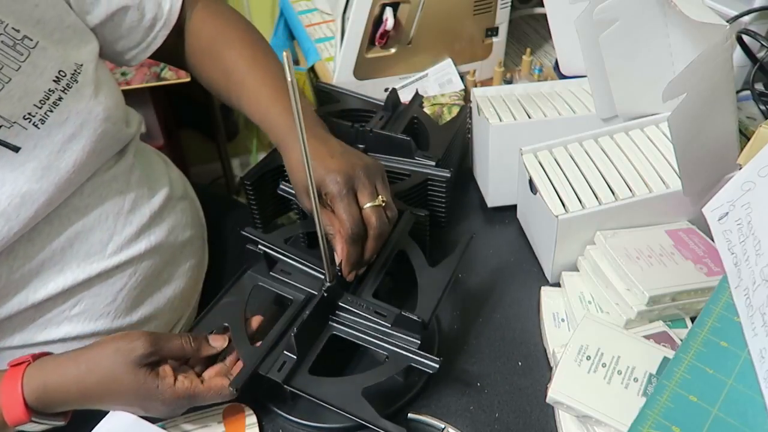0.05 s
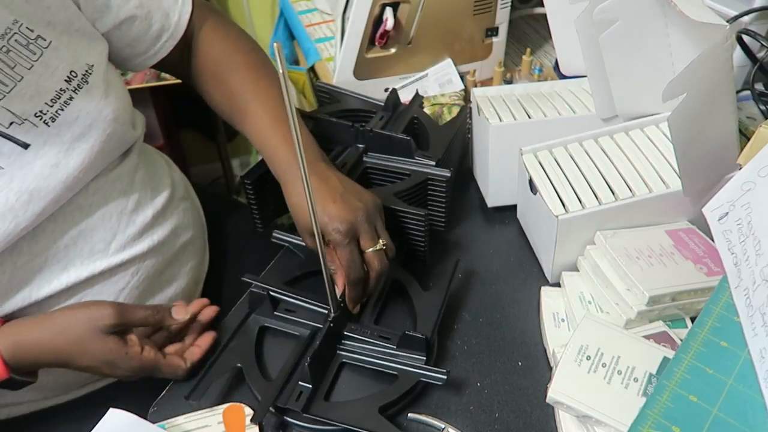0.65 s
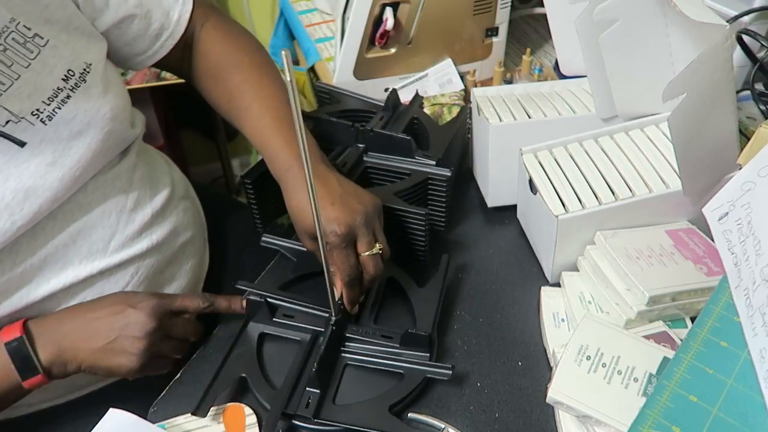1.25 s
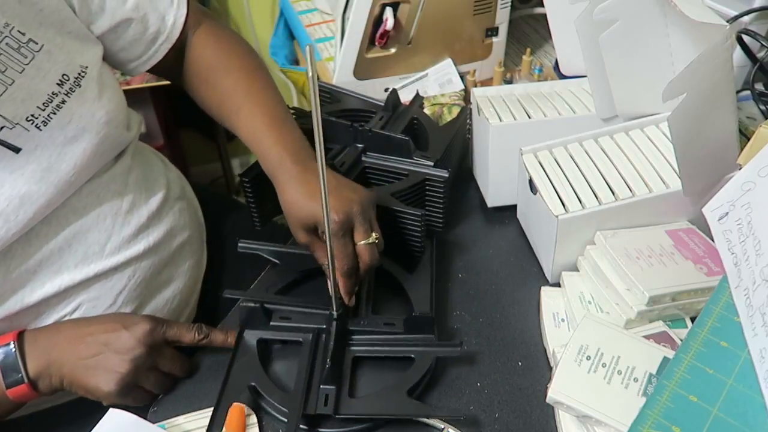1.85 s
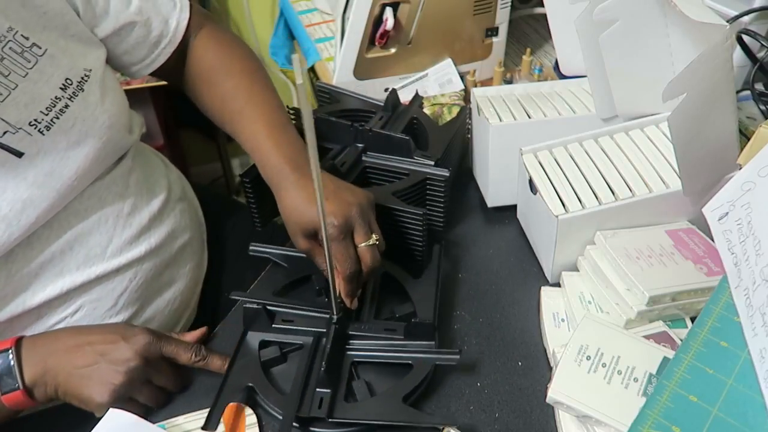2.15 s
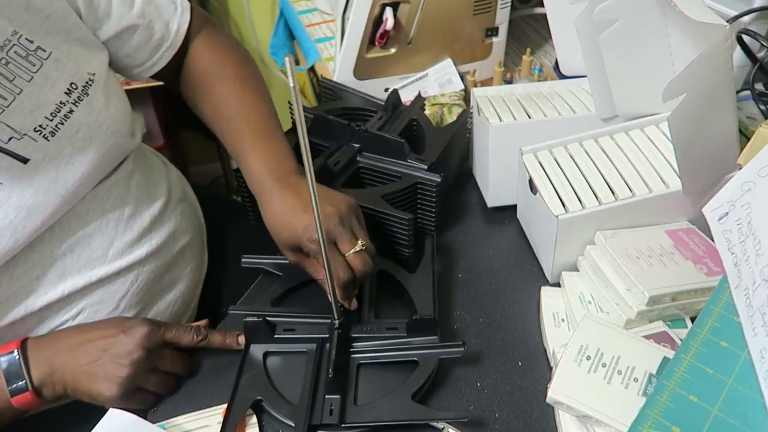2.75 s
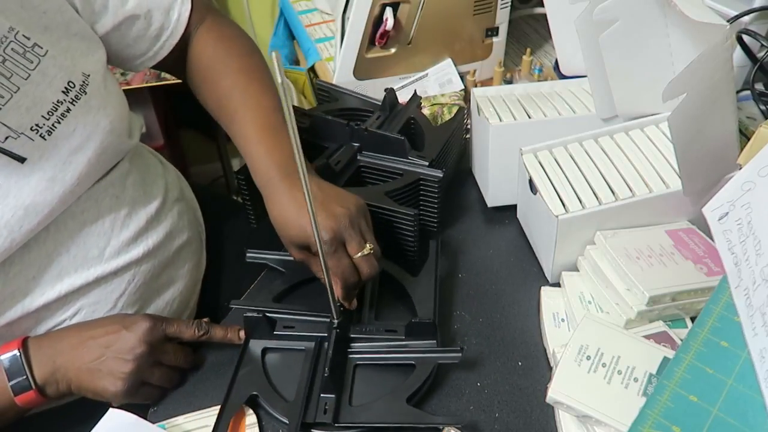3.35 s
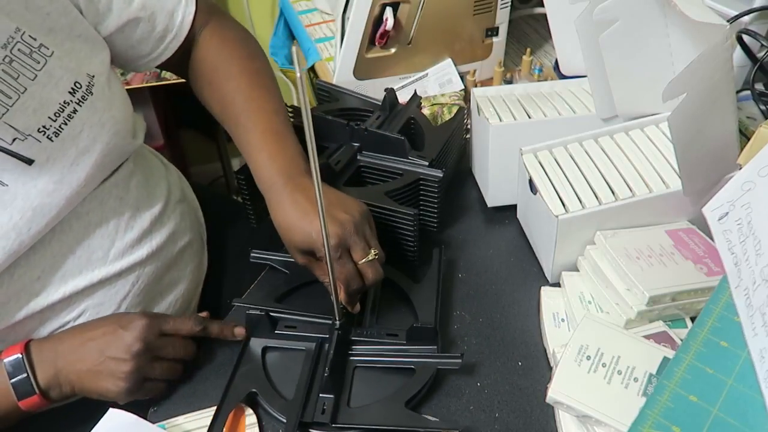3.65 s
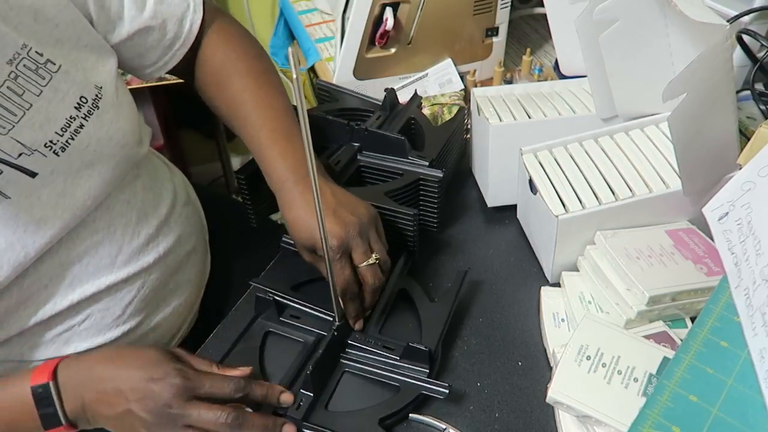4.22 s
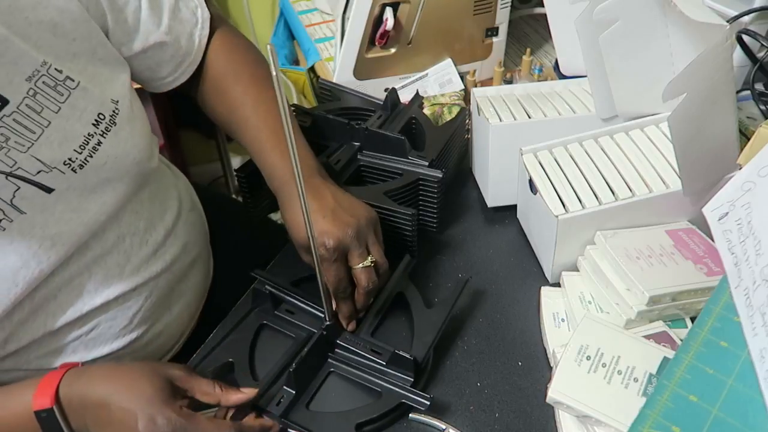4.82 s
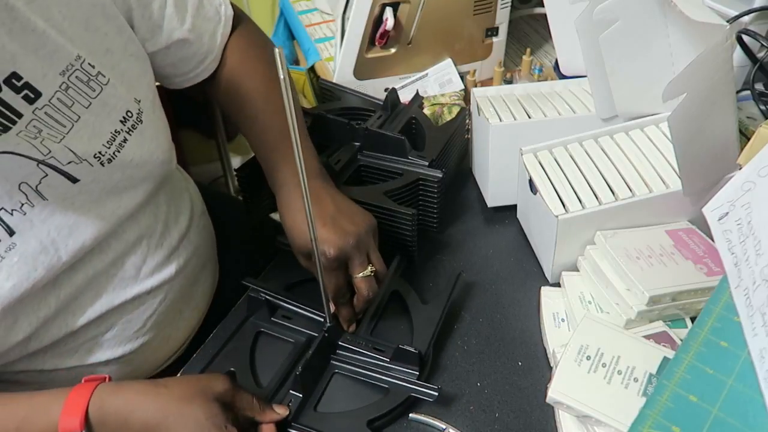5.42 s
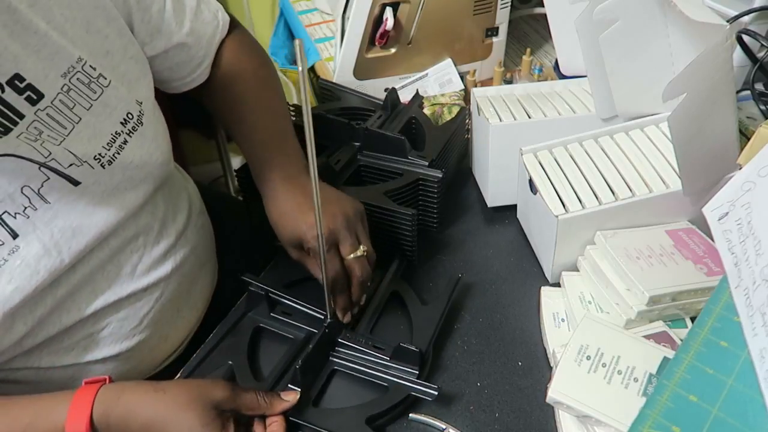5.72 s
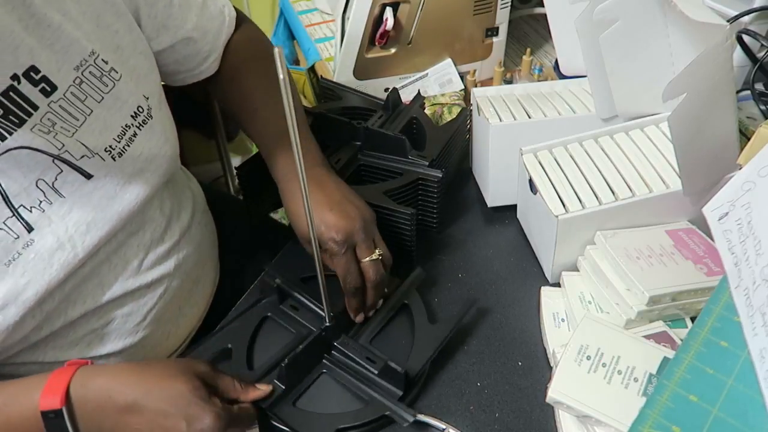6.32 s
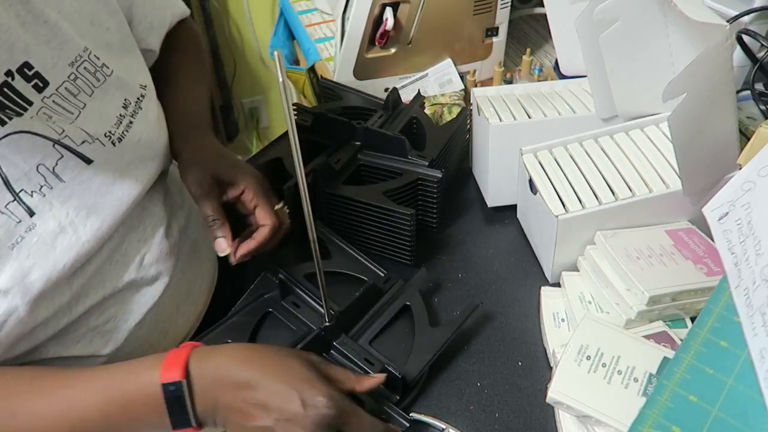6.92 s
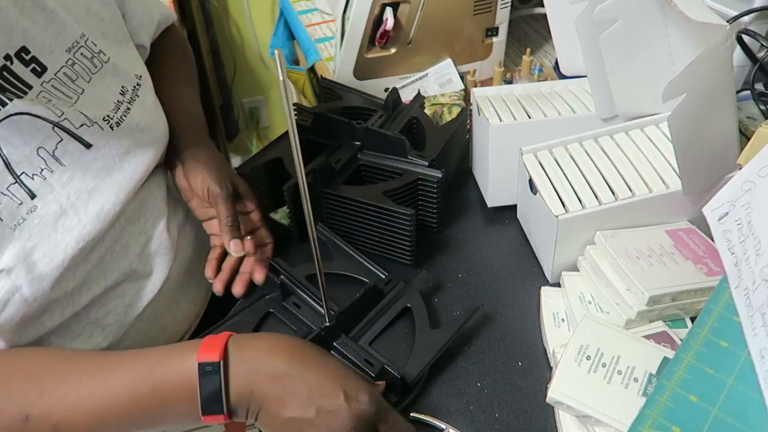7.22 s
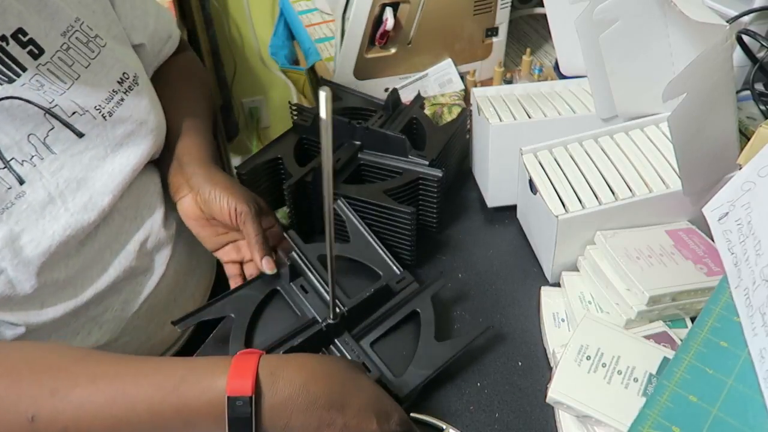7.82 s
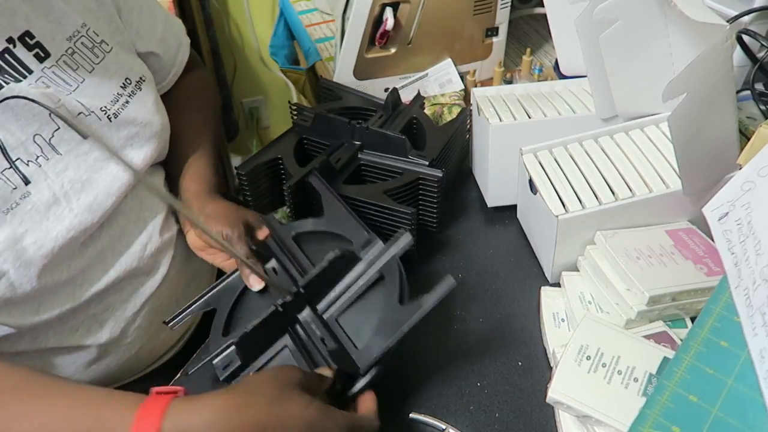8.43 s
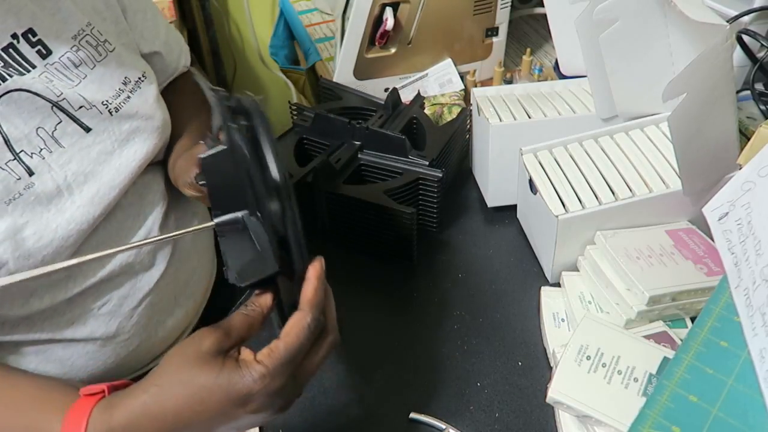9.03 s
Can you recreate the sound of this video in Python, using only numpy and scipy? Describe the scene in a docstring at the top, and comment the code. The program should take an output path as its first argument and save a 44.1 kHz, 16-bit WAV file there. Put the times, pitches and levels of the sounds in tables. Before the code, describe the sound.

Hard plastic trays click and chatter as hands turn and push them around an upright metal rod. The sounds come in uneven flurries, with short scrapes of tray over tray and dull knocks as the stack rocks on the table. Near the end, the clatter thickens and thin tabs ping briefly before it dies down. The handling sounds close, in a small room with faint air noise and hum.

```python
"""Hard plastic trays click and chatter on an upright metal rod as hands turn, push and lift the stack.
Each edge scuffs, lands and rings the tray modes; thin tabs ping. Tray scrapes over tray by stick-slip.
The stack rocks and knocks dully on its base, the table booms softly, skin rubs on plastic.
Small room with air noise and faint mains hum; stereo."""
import sys
import numpy as np
from scipy import signal
from scipy.fft import rfft, irfft, next_fast_len
from scipy.io import wavfile
from scipy.ndimage import uniform_filter1d

SR = 44100
rng = np.random.default_rng(int(sys.argv[2]) if len(sys.argv) > 2 else 0)


def materialize(psi):
    """Save the field psi as 16-bit PCM at rate SR to the path in sys.argv[1].

    A 1-D psi becomes a single channel; in a 2-D psi each row is a channel.
    """
    bounded = np.clip(np.atleast_2d(psi).T, -1, 1)
    quanta = np.round(bounded * 32767).astype(np.int16)
    wavfile.write(sys.argv[1], SR, quanta)


N = 399987
TIME_S, RING_S = np.arange(N) / SR, np.arange(8192) / SR
ATTACK_SAMPLES = int(.01 * SR)
GRIP_DETUNE = .018  # relative spread of mode frequencies

# air noise spectrum: f/Hz, gain/dB
AIR_COLOUR = [(15, -36), (25, 2), (115, 2.5), (224, -2.5), (354, -4), (709, -8.5), (903, -10), (1350, -8.5),
              (2070, -13.5), (2240, -14), (3830, -20), (11800, -46), (15000, -62.5)]
# mains partials: f/Hz, level/dB re air
HUM_PARTIALS = [(59.2, -12.5), (118.4, -9)]
# background envelope: t/s, level/dB
BACKGROUND_ENVELOPE = [(0, -49.5), (.55, -67), (.9, -59.5), (1.5, -54), (3, -57), (3.7, -60), (4.2, -58.5),
                       (5, -48.5), (6.8, -55.5), (9.07, -56)]

# table top modes: f/Hz, level/dB, t60/s
TABLE_MODES = [(77.6, -7.5, 0.2), (112, 6.5, 0.12), (146.7, -1.5, 0.24), (205, 0, 0.16)]
# modes of the stack on its base: f/Hz, level/dB, t60/s
BASE_MODES = [(109, -19, 0.4), (148, -23, 0.06), (240, -9, 0.033), (269, -14, 0.52), (351, -9, 0.24),
              (398.2, 1.5, 0.13), (455.3, -3.5, 0.059), (556.8, -9.5, 0.26), (665, 2.5, 0.2),
              (726.6, -7, 0.24), (836, -7, 0.068), (974, -7, 0.23)]
# tray modes: f/Hz, level/dB, t60/s
TRAY_MODES = [(1333, -1.5, 0.28), (1452, 4, 0.041), (1470, 2.5, 0.049), (1660, -1.5, 0.14), (1649, 0, 0.11),
              (1972, 3, 0.064), (2055, 4.5, 0.085), (2140, 0, 0.28), (2305, 1.5, 0.03), (2218, 4.5, 0.21),
              (2479, 2, 0.11), (2703, -1.5, 0.21), (2930, -4.5, 0.11), (3093, -5, 0.062),
              (3160, -14.5, 0.042), (3740, -9.5, 0.46), (4210, -4.5, 0.044), (5050, -14.5, .15),
              (5410, -22.5, 0.079), (6810, -15, 0.059), (7630, -24, .12), (7800, -34.5, 0.075),
              (11340, -21, 0.13)]
# tab modes: f/note, level/dB, t60/s
TAB_MODES = [(1, -7, 0.053), (1.05, -10.5, .035), (1.65, -15.5, .035)]
# dense weak tray modes: f/Hz, gain/dB
TRAY_WASH = [(550, -39.5), (850, -12.5), (1050, -6), (1400, 4.5), (2200, -4), (3000, -3.5), (4000, -12),
             (5000, -20.5), (8000, -29.5), (10000, -38), (15000, -42)]
# dense weak base modes: f/Hz, gain/dB
BASE_WASH = [(35, -32), (70, -18), (110, -10.5), (190, -7.5), (300, -3), (400, -1), (720, 3), (850, -8.5),
             (1100, -0.5), (1800, -51)]
# rocking base spectrum: f/Hz, gain/dB
ROCK_SPECTRUM = [(25, -7), (70, -3), (120, 8), (190, -4), (300, 2), (400, 5), (520, 0.5), (600, -4),
                 (680, 10), (820, -6), (1100, -17.5), (1800, -42.5)]
# skin friction spectrum: f/Hz, gain/dB
SKIN_SPECTRUM = [(2500, -19.5), (4500, 4.5), (6000, 5.5), (8000, 0), (10000, -3.5), (12500, -2.5),
                 (15000, -30.5)]

# hand pushes reaching the table: t/s, level/dB
TABLE_THUMPS = [(0.246, -34.5), (2.041, -46), (3.347, -35), (3.382, -39), (3.491, -43), (4.573, -47),
                (5.419, -43), (6.124, -38.5), (6.165, -38), (6.327, -39), (7.108, -39), (7.758, -42),
                (7.812, -38.5), (8.222, -36)]
# skin friction envelope: t/s, level/dB
SKIN_ENVELOPE = [(0, -67), (.35, -55.5), (.56, -86), (1.85, -86), (2.02, -61.5), (2.4, -70), (2.8, -82.5),
                 (3.4, -69), (3.7, -90), (4.22, -77.5), (4.3, -71.5), (6.55, -64.5), (6.94, -72.5),
                 (6.98, -50), (7.12, -53.5), (7.2, -68.5), (8.26, -65), (8.5, -73.5), (9.07, -74.5)]
# turns of the stack: peak t/s, build/s, release/s, scrape/dB before trim, rock/dB
STACK_TURNS = [(0.0, .05, 0.086, -28.5, -37), (0.3, .12, 0.093, -22.5, -32), (0.5, .08, .04, -34.5, -51),
               (0.752, .15, 0.21, -49, -60.5), (0.959, 0.21, 0.16, -44, -50.5), (1.4, 0.82, .5, -53, -55),
               (1.879, .15, .15, -47, -48.5), (2.002, 0.091, 0.13, -27, -34.5),
               (2.141, 0.024, 0.29, -27.5, -36), (2.36, 0.16, 0.36, -31, -37),
               (2.56, 0.27, .22, -32, -38.5), (2.7, 0.18, 0.044, -24, -34),
               (3.39, 0.18, 0.051, -30.5, -36.5), (3.98, 0.13, 0.093, -35, -44.5),
               (4.35, 0.058, 1, -44.5, -53.5), (4.67, 0.13, 0.15, -37.5, -45.5),
               (5.02, 0.19, 0.6, -39.5, -48.5), (5.55, 0.58, 0.28, -43.5, -54), (5.8, 0.26, 0.61, -40, -45),
               (6.29, 0.12, 0.22, -39.5, -38.5), (6.61, 0.19, 0.036, -33.5, -49.5),
               (7.15, 0.17, 0.099, -27, -42.5), (7.5, 0.34, 0.92, -40, -44), (7.8, 0.29, 0.33, -27, -40.5),
               (8.17, .13, 0.34, -36.5, -55)]
# edge sliding on its neighbour: start/s, end/s, level/dB, centre f/Hz
EDGE_SLIDES = [(0.092, 0.16, -37, 2440), (0.208, 0.243, -29.5, 2340), (0.345, 0.398, -30, 2300),
               (1.949, 2.016, -38, 1700), (1.986, 2.069, -32.5, 2120), (2.375, 2.544, -41, 1820),
               (3.798, 3.942, -40.5, 2780), (4.249, 4.347, -46.5, 2300), (4.714, 4.776, -41.5, 3020),
               (5.706, 5.905, -45, 1970), (6.054, 6.12, -32.5, 2110), (6.105, 6.147, -36.5, 2060),
               (6.218, 6.331, -31.5, 1950), (6.609, 6.657, -33.5, 1900), (7.744, 7.8, -28, 2400),
               (7.836, 7.903, -26.5, 2120)]
# tab flicks: t/s, level/dB, note f/Hz
TAB_PINGS = [(2.885, -50, 2155), (2.917, -44.5, 1462), (3.098, -43.5, 2370), (3.31, -33, 1430),
             (4.378, -43, 1490), (4.391, -39.5, 1670), (4.422, -46, 1630), (7.834, -36, 3340),
             (7.935, -32, 2380), (7.997, -30, 2170), (8.045, -30, 2264), (8.077, -18.5, 2210),
             (8.14, -30.5, 2185), (8.306, -39, 2300)]
# stack dropping on the table: t/s, level/dB before trim, centre f/Hz
STACK_KNOCKS = [(0.0894, -25, 433), (0.1866, -27, 520), (0.25, -13, 437), (0.491, -29.5, 473),
                (0.7672, -40.5, 573), (1.172, -31.5, 434), (1.3606, -26.5, 534), (2.0495, -23, 460),
                (2.204, -16, 654), (2.4973, -23.5, 690), (2.6298, -19, 406), (3.142, -25, 390),
                (3.3863, -16.5, 517), (3.4968, -14, 560), (3.5822, -28.5, 580), (4.7032, -28.5, 550),
                (5.0452, -29.5, 570), (6.03, -34.5, 490), (6.1237, -36, 460), (6.159, -32, 398),
                (7.1101, -11, 477), (7.2839, -24, 496), (7.3716, -27, 520), (7.511, -36, 404),
                (7.6281, -29, 570), (8.2273, -14, 855)]
# edge landings: t/s, ring level/dB, centre f/Hz, body/dB, snap/dB (both re ring, before trim),
# nominal damping t60/s
EDGE_CLICKS = [(0.079, -23.5, 2120, -12, -24.0, 0.12), (0.266, -20.5, 2640.0, -20, -10.5, 0.073),
               (0.277, -14.5, 2520, -15, -21, 0.065), (0.377, -3.5, 2100, -16.5, -15.5, 0.029),
               (0.401, -21.5, 1860, -32, -43, 0.21), (0.441, -19, 2310.0, -13.5, -22, 0.058),
               (0.612, -48.5, 2050.0, -8.5, -37, 0.09), (0.928, -19.0, 2075, -9, -18, 0.078),
               (0.957, -28, 1740.0, -15.5, -25, 0.14), (1.003, -33.5, 1930, -7.5, -26, 0.12),
               (1.138, -44.0, 1810.0, -7, -22.0, 0.33), (1.212, -40.0, 1600.0, -7.5, -45, 0.055),
               (1.24, -37.0, 1720, -5.5, -30, 0.11), (1.3137, -37.5, 1710, -7, -44.0, 0.083),
               (1.3765, -30.5, 1760, -10, -25.0, 0.052), (1.4134, -40.0, 1950.0, -19, -30.0, 0.034),
               (1.4643, -45, 2260, -19, -26, 0.048), (1.533, -33.0, 2020, -7.5, -33.0, 0.068),
               (1.56, -41, 1890, -0.5, -28, 0.4), (1.657, -29, 2270, -19, -22.5, 0.079),
               (1.672, -29, 1830, -5.5, -39, 0.13), (1.893, -43, 2030, -14, -36, 0.063),
               (1.934, -32.5, 1510, -7, -41, 0.2), (2.0062, -24, 2210.0, -8, -15.5, 0.21),
               (2.045, -16.5, 1910, -9.5, -22.5, 0.12), (2.1425, -14, 1820, -13.5, -18.5, 0.05),
               (2.1598, -24.5, 1920.0, -11, -21, 0.14), (2.1918, -25.0, 2190.0, -6, -15.5, 0.13),
               (2.202, -19.5, 2010, -6.5, -35, 0.093), (2.289, -31.5, 2290.0, -5, -21, 0.043),
               (2.3468, -21, 1970.0, -6, -24.5, 0.054), (2.381, -17.0, 1970, -6.0, -20.5, 0.073),
               (2.4453, -26.5, 1630.0, -1.5, -48, 0.088), (2.4714, -23.5, 1840, -6.5, -54, 0.13),
               (2.4945, -24, 1900, -12, -48, 0.18), (2.5943, -28.5, 2580, -11.0, -16.5, 0.049),
               (2.6742, -10, 2110, -12, -22, 0.033), (3.041, -42.5, 1910, -0.5, -43.5, 0.13),
               (3.0978, -39.0, 2190.0, -1.0, -32, 0.095), (3.15, -31.5, 2060.0, -9, -34, 0.082),
               (3.3357, -29.5, 2010.0, -12, -19.5, 0.073), (3.3788, -17.5, 2090, -10.5, -25.5, 0.055),
               (3.4307, -14.5, 2180, -11.5, -31, 0.042), (3.4692, -16, 2080, -11, -15.5, 0.094),
               (3.4799, -15.5, 2240, -2.5, -18, 0.091), (3.4948, -13.5, 2200, -6.0, -14, 0.052),
               (3.5106, -13.5, 2330, -17, -22, 0.047), (3.5432, -30, 2520.0, -10, -29, 0.097),
               (3.963, -15.5, 2220, -12.5, -22.0, 0.072), (3.9857, -15.5, 2220, -20.0, -34.0, 0.035),
               (4.0488, -41, 1610.0, -18, -34.0, 0.08), (4.1093, -47, 1830.0, -1.0, -19.5, 0.16),
               (4.4488, -25.5, 2700, -12.5, -29.0, 0.032), (4.569, -22.5, 2100, -12.5, -18.5, 0.045),
               (4.58, -25.5, 1780, -7, -25, 0.055), (4.6709, -35.5, 1970.0, -5, -23, 0.06),
               (4.8035, -32.0, 2230, -4.0, -30.0, 0.07), (4.8833, -28, 2120, -7.5, -44, 0.1),
               (4.9468, -39, 1950.0, -10, -32, 0.2), (5.0221, -26.5, 2380.0, -6, -49, 0.12),
               (5.1078, -19.5, 2730.0, -11, -37, 0.059), (5.1458, -18, 2060.0, -18, -29.5, 0.078),
               (5.3302, -40.0, 1670, -1.5, -21, 0.027), (5.4201, -27.5, 2320.0, -10, -17.5, 0.069),
               (5.549, -47, 2190, 0, -11, 0.021), (5.7734, -44.5, 2210.0, 5.5, -7.5, 0.21),
               (5.8596, -28.5, 1910, -6.5, -26, 0.062), (5.9282, -31, 1720.0, -12, -46.0, 0.07),
               (5.9665, -14.0, 2470, -16.5, -33, 0.021), (6.1595, -38.5, 2010, -7, -23, 0.04),
               (6.324, -11.5, 2380, -9.5, -23.5, 0.052), (6.41, -28.5, 2170, -7, -26.0, 0.18),
               (6.508, -29, 1770, -11.5, -21.5, 0.014), (6.9679, -29, 1670, -8.5, -16.5, 0.06),
               (7.0316, -35, 2330, -22, -23, 0.078), (7.1006, -30.5, 1680, -9, -13, 0.12),
               (7.1166, -18, 1560, -8.5, -35, 0.043), (7.1456, -19, 2130, -27, -21.0, 0.084),
               (7.155, -14.5, 2060, -10, -18.5, 0.022), (7.1842, -26, 1930, -17, -35, 0.044),
               (7.259, -38, 1950, 1, -23, 0.089), (7.2788, -26.5, 1880, -9, -20, 0.035),
               (7.364, -34, 1840, -25.0, -44.0, 0.055), (7.4554, -35.5, 1550, -5, -33, 0.039),
               (7.6643, -32, 1730.0, -3.5, -20, 0.04), (7.7365, -16, 2390.0, -14.5, -23.0, 0.12),
               (7.7757, -15.5, 2370, -19, -21.5, 0.061), (7.834, -20, 2460.0, -19, -28, 0.11),
               (7.866, -19, 1960, -13.5, -27.0, 0.065), (7.897, -9, 1950, -19, -19, 0.044),
               (8.0437, -33.5, 2250.0, -19.0, -11.0, 0.051), (8.0793, -33.0, 2420.0, -16, -11, 0.08),
               (8.168, -34.5, 1990.0, -2, -37, 0.13), (8.195, -25, 2200, -18, -19, 0.06),
               (8.2024, -19.5, 2340.0, -19, -20, 0.072), (8.2143, -20.5, 1990, -19, -24, 0.095),
               (8.2384, -14.5, 2230, -20, -15.5, 0.035), (8.499, -35.5, 1890.0, -21, -21.5, 0.05),
               (8.7256, -44.5, 2110.0, -18, -20, 0.085)]


def undb(db):
    return 10 ** (np.asarray(db) / 20)


def unit(x, count=None):
    """Scale to rms 1 over the first count samples."""
    return x / np.sqrt(np.mean(x[..., :count] ** 2) + 1e-18)


def spectrum(points, size):
    """Interpolate (f/Hz, value) points onto FFT bins."""
    hz, value = np.transpose(points)
    return np.interp(np.log1p(np.fft.rfftfreq(size, 1 / SR)), np.log1p(hz), value)


def colour(x, points):
    """Minimum-phase filter from (f/Hz, gain/dB) points."""
    size = next_fast_len(len(x), True)
    cepstrum = irfft(np.log(undb(spectrum(points, size))), size)
    cepstrum[1:size // 2] *= 2
    cepstrum[size // 2 + 1:] = 0
    return irfft(rfft(x, size) * np.exp(rfft(cepstrum)), size)[:len(x)]


def cut(x, hz, kind):
    return signal.sosfilt(signal.butter(4, hz, kind, fs=SR, output="sos"), x)


def fade(t60_s):
    return np.exp(-np.log(1000) * RING_S / t60_s)


def rise(tau_s):
    return 1 - np.exp(-RING_S / tau_s)


def add(track, t_s, sound):
    start = max(int(t_s * SR), 0)
    track[start:start + len(sound)] += sound[:max(N - start, 0)]


def walk(rate_hz):
    """Smooth random drift, spread near 1."""
    hold = int(SR / rate_hz)
    steps = np.repeat(rng.standard_normal(N // hold + 1), hold)
    return 1.3 * uniform_filter1d(steps, hold)[:N]


def ringing(modes):
    """One decaying sine per mode, in rows."""
    return np.array([undb(db) * np.sin(2 * np.pi * hz * RING_S) * fade(t60_s) for hz, db, t60_s in modes])


def gripped(modes):
    """Grip shifts each mode slightly."""
    return [(hz * (1 + GRIP_DETUNE * rng.standard_normal()), db, t60_s) for hz, db, t60_s in modes]


def strike(rings, wash_colour, wash_db, wash_t60_s, scatter_db):
    """One blow: the contact point reweights the modes, over a wash of weaker ones."""
    weights = rng.choice([-1, 1], len(rings)) * undb(scatter_db * rng.standard_normal(len(rings)))
    wash = colour(rng.standard_normal(len(RING_S)) * fade(wash_t60_s), wash_colour)
    return unit(weights @ rings, ATTACK_SAMPLES) + undb(wash_db) * unit(wash, ATTACK_SAMPLES)


def favour(x, hz, skirt_db):
    """Contact hardness favours the octave around hz."""
    return unit(colour(x, [(hz / 2, skirt_db), (hz, 0), (hz * 2, skirt_db)]), ATTACK_SAMPLES)


def slips(rate_hz, spread_db):
    """Stick-slip: random tiny jerks, a few much larger."""
    size = undb(spread_db * np.minimum(rng.exponential(size=N), 4))
    return (rng.random(N) < rate_hz / SR) * size * rng.standard_normal(N)


def room_tone():
    """Air noise and mains hum, swelling and sinking together."""
    air = unit(colour(rng.standard_normal(N), AIR_COLOUR))
    hum = sum(undb(db + 1.3 * walk(5.6)) * np.sin(2 * np.pi * hz * TIME_S) for hz, db in HUM_PARTIALS)
    return (air + hum) * undb(np.interp(TIME_S, *np.transpose(BACKGROUND_ENVELOPE)))


def small_room(x, wet_db, t60_s, treble_t60_s):
    """Direct sound plus wall reflections building over 8 ms."""
    noise = rng.standard_normal(len(RING_S))
    tail = cut(noise, 5500, "low") * fade(t60_s) + cut(noise, 5000, "high") * fade(treble_t60_s)
    tail *= np.clip(RING_S / 0.008, 0, 1) ** 2
    return x + undb(wet_db) * signal.fftconvolve(x, tail / np.linalg.norm(tail))[:N]


def stereo_ports(x, side_db):
    """Two microphone ports: nearby surfaces shift their phase; the right gets more of the low modes."""
    echoes = rng.standard_normal(len(RING_S)) * (fade(.02) + undb(-12.5) * fade(.2))
    ripple = unit(rfft(echoes, N).real)
    shift_db = spectrum([(60, -24), (130, -12.5), (300, -8.5), (600, -18), (2400, -26.5),
                         (4500, -14), (8000, -7.5), (12000, -12)], N)
    lean_db = spectrum([(150, -40.5), (280, -15), (380, -15), (520, -23.5), (750, -49)], N)
    side = irfft(rfft(x) * (1j * ripple * undb(side_db + shift_db) - undb(lean_db)), N)
    return np.array([x + side, x - side])


def table_thumps():
    """Hand weight lands on the stack; the table booms softly."""
    out, table = np.zeros(N), ringing(TABLE_MODES)
    for t_s, db in TABLE_THUMPS:
        boom = undb(1.2 * rng.standard_normal(len(table))) @ table
        add(out, t_s, undb(db) * unit(boom * rise(0.0024), 2 * ATTACK_SAMPLES))
    return cut(out, 55, "high")


def skin_rub():
    """Skin hisses on plastic: dense stick-slip."""
    hiss = unit(colour(slips(rate_hz=9000, spread_db=2.9), SKIN_SPECTRUM))
    return hiss * undb(np.interp(TIME_S, *np.transpose(SKIN_ENVELOPE)) + 2 * walk(22))


def turn_gains(scrape_rest_db=-63, rock_rest_db=-64.5, scrape_drop_db=19.5, rock_drop_db=11.5):
    """Scrape and rock gains: each turn builds to its hardest push, then lets go."""
    scrape, rock = np.full(N, undb(scrape_rest_db)), np.full(N, undb(rock_rest_db))
    for peak_s, build_s, release_s, scrape_db, rock_db in STACK_TURNS:
        spans = np.maximum((peak_s - TIME_S) / build_s, (TIME_S - peak_s) / release_s)
        near = spans < 4
        scrape[near] = np.maximum(scrape[near], undb(scrape_db - scrape_drop_db * spans[near]))
        rock[near] = np.maximum(rock[near], undb(rock_db - rock_drop_db * spans[near]))
    return scrape, rock


def base_rocking(gain):
    """The base rocks and grumbles in small jerks."""
    return unit(colour(slips(rate_hz=700, spread_db=1.5), ROCK_SPECTRUM)) * gain


def tray_scrape(gain, trim_db=-4):
    """Tray over tray: stick-slip drives hand-damped modes, plus grit."""
    held = ringing(TRAY_MODES) * fade(0.29)
    jerks = slips(rate_hz=1000, spread_db=3.2)
    ring = signal.fftconvolve(jerks, rng.choice([-1, 1], len(held)) @ held)[:N]
    grit = colour(slips(rate_hz=1500, spread_db=5), TRAY_WASH)
    scrape = unit(cut(unit(ring) + undb(-3.5) * unit(grit), 5500, "low"))
    return scrape * gain * undb(trim_db + 3.8 * walk(25))


def edge_slides():
    """Swells of fast, uneven stick-slip; pressed together, the trays barely ring."""
    out = np.zeros(N)
    friction = slips(rate_hz=1700, spread_db=2.8) * undb(3 * walk(90))
    for start_s, end_s, db, hz in EDGE_SLIDES:
        jerks = friction[int(start_s * SR):int(end_s * SR)]
        jerks = jerks * np.hanning(len(jerks)) ** 0.45
        pressed = ringing(gripped(TRAY_MODES)) * fade(0.096)
        contact = strike(pressed, TRAY_WASH, wash_db=1, wash_t60_s=0.019, scatter_db=2.5)
        contact = favour(cut(contact, 6300, "low"), hz, skirt_db=-5)
        add(out, start_s, undb(db) * unit(signal.fftconvolve(jerks, contact), len(jerks)))
    return out


def tab_pings():
    """A flicked tab rings briefly: note, bright overtone, short rasp."""
    out = np.zeros(N)
    for t_s, db, hz in TAB_PINGS:
        note = ringing([(ratio * hz, mode_db, t60_s) for ratio, mode_db, t60_s in TAB_MODES])
        blow = strike(note, TRAY_WASH, wash_db=-10, wash_t60_s=.04, scatter_db=1)
        add(out, t_s, undb(db) * unit(blow * rise(0.0012), ATTACK_SAMPLES))
    return out


def stack_knocks(trim_db=-2.5):
    """The stack tips and drops back: blunt push, then low modes shifted by the grip."""
    out = np.zeros(N)
    push = unit(colour(signal.unit_impulse(len(RING_S)), BASE_WASH), ATTACK_SAMPLES)
    for t_s, db, hz in STACK_KNOCKS:
        blow = strike(ringing(gripped(BASE_MODES)), BASE_WASH, wash_db=-9, wash_t60_s=0.1, scatter_db=5)
        bump = blow * fade(.2) + undb(-7) * push
        add(out, t_s, undb(db + trim_db) * favour(bump, hz, skirt_db=-8.5))
    return cut(out, 77, "high")


def rib_modes(count):
    """Short random notes of ribs and corners."""
    hz = np.exp(rng.uniform(np.log(1250), np.log(14000), count))
    db = np.interp(hz, *np.transpose(TRAY_WASH))
    return np.sin(2 * np.pi * hz[:, None] * RING_S) * undb(db)[:, None] * fade(0.36)


def edge_clicks(scuff_lead_s=0.0064, scuff_db=-18, snap_trim_db=6.5, body_trim_db=-0.5):
    """An edge drags and lands: scuff, snap, finger-damped tray ring, some stack body."""
    out, base = np.zeros(N), ringing(BASE_MODES)
    landing = rise(.0017)
    drag = np.minimum(RING_S / scuff_lead_s, 1) * fade(.035)
    for t_s, db, hz, body_db, snap_db, t60_s in EDGE_CLICKS:
        t60_s = max(t60_s, .02)
        rings = np.vstack([ringing(gripped(TRAY_MODES)), undb(1.5) * rib_modes(24)])
        rings *= fade(0.89 * t60_s)
        blow = strike(rings, TRAY_WASH, wash_db=-3, wash_t60_s=1.406 * t60_s, scatter_db=3.5)
        ring = favour(cut(blow, 4800, "low") * landing, hz, skirt_db=-10.5)
        snap = unit(cut(blow, 3470, "high") * landing, ATTACK_SAMPLES)
        body = strike(base, BASE_WASH, wash_db=-3.5, wash_t60_s=0.11, scatter_db=4)
        body = unit(body * fade(0.88), ATTACK_SAMPLES)
        scuff = unit(colour(rng.standard_normal(len(RING_S)) * drag, TRAY_WASH), ATTACK_SAMPLES)
        click = ring + undb(snap_db + snap_trim_db) * snap + undb(body_db + body_trim_db) * body
        add(out, t_s - scuff_lead_s, undb(db + scuff_db) * scuff)
        add(out, t_s, undb(db) * click)
    return cut(out, 85, "high")


def scene():
    scrape_gain, rock_gain = turn_gains()
    impacts = edge_clicks() + stack_knocks() + tab_pings()
    friction = edge_slides() + tray_scrape(scrape_gain) + base_rocking(rock_gain) + skin_rub()
    in_room = small_room(impacts + friction + table_thumps(), wet_db=-14.5, t60_s=0.15, treble_t60_s=0.16)
    return stereo_ports(in_room + room_tone(), side_db=5)


def record(dry):
    """Soft overload on the loudest clicks, then a steep low-pass."""
    overloaded = np.tanh(dry + dry ** 3 / 3)
    return signal.sosfilt(signal.ellip(8, .2, 70, 15500, fs=SR, output="sos"), overloaded)


dry = scene()
out = record(dry)
materialize(out)
```